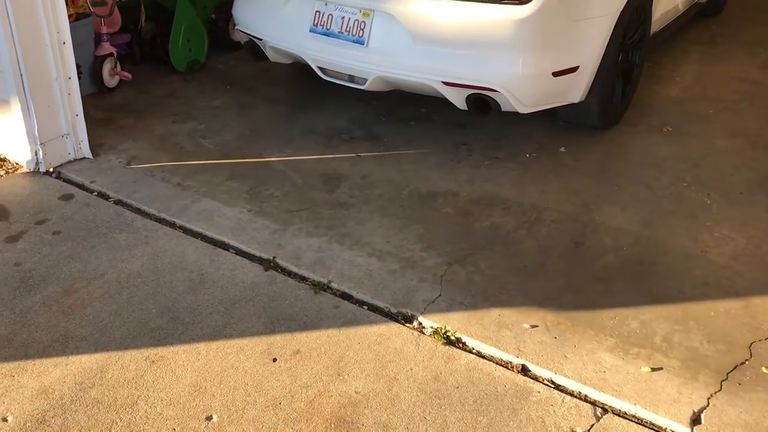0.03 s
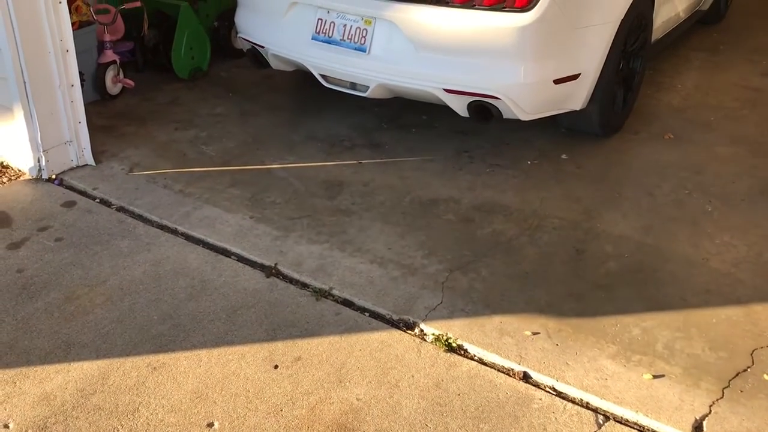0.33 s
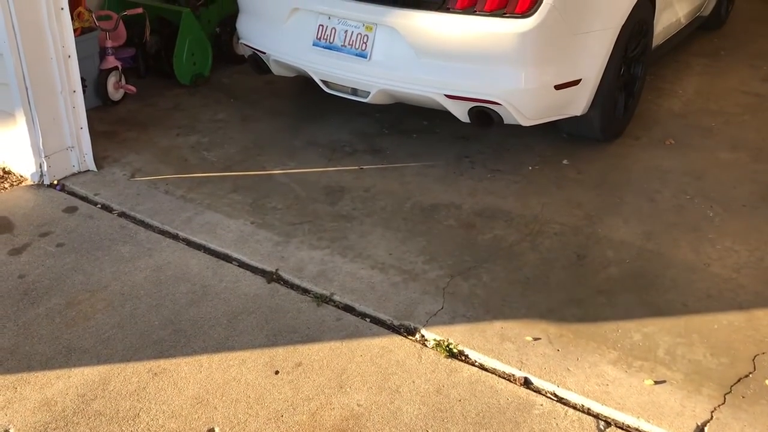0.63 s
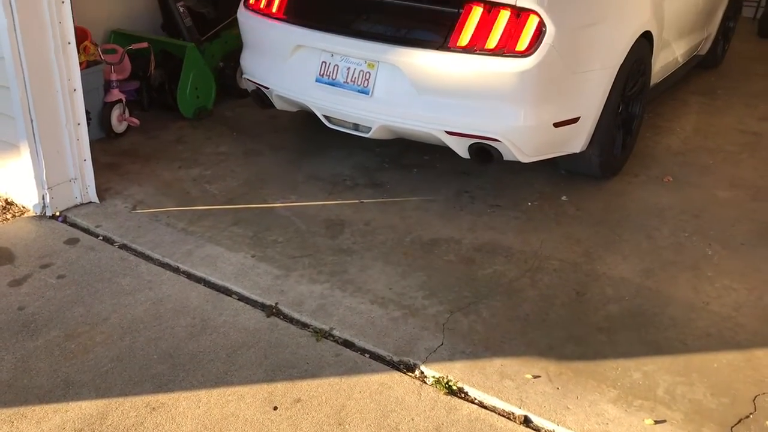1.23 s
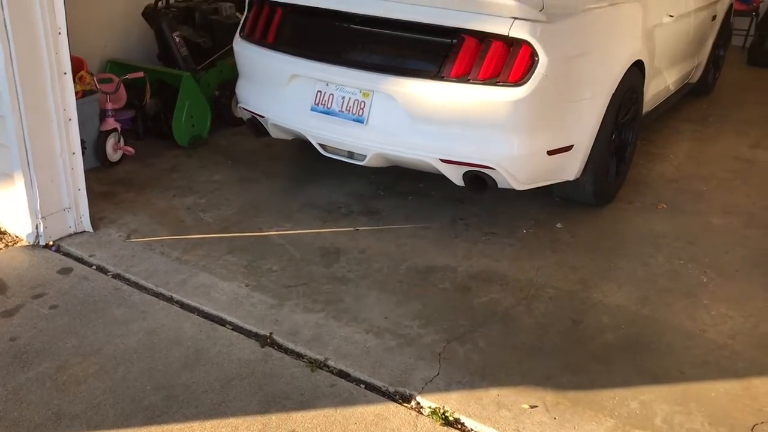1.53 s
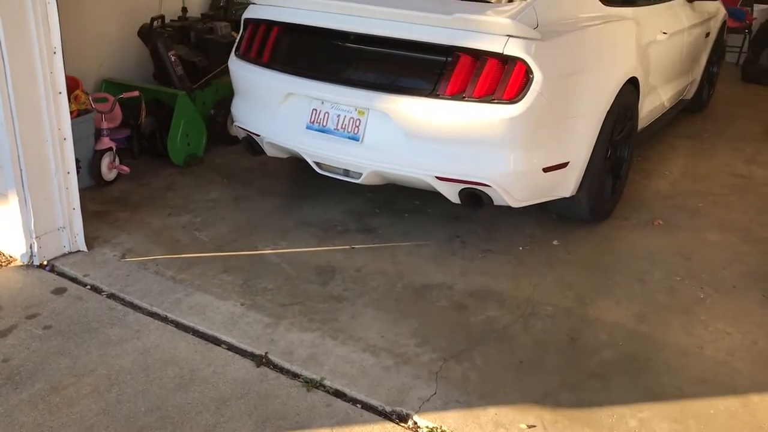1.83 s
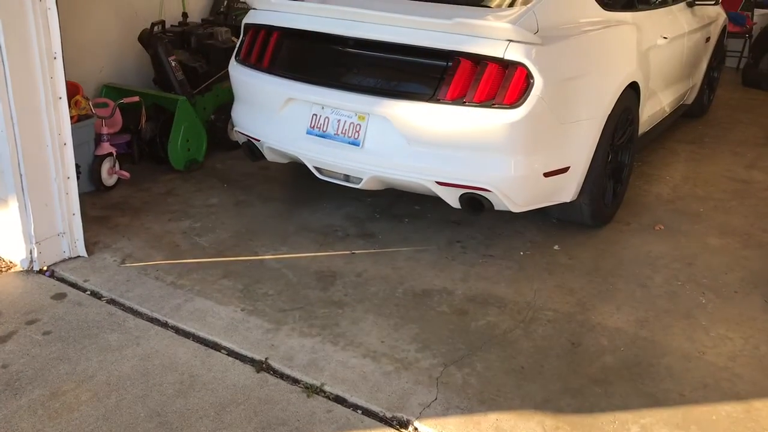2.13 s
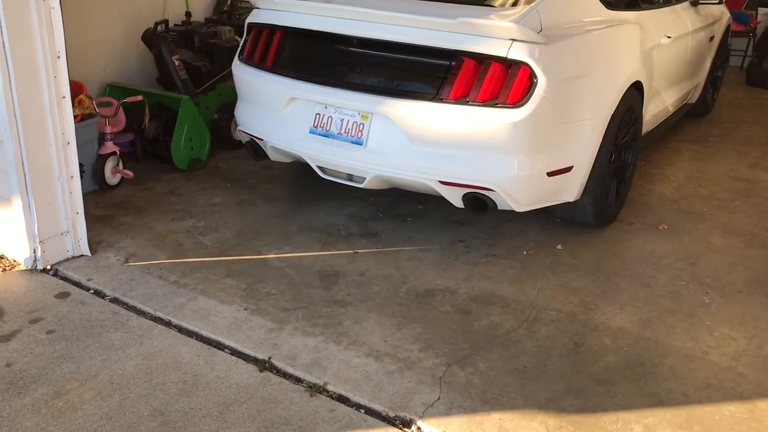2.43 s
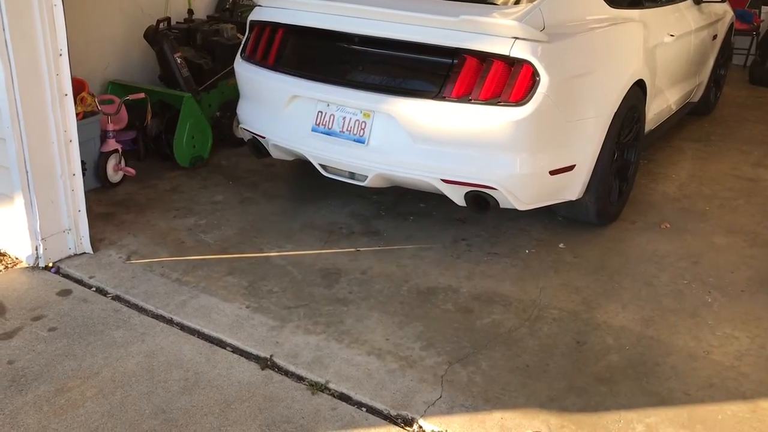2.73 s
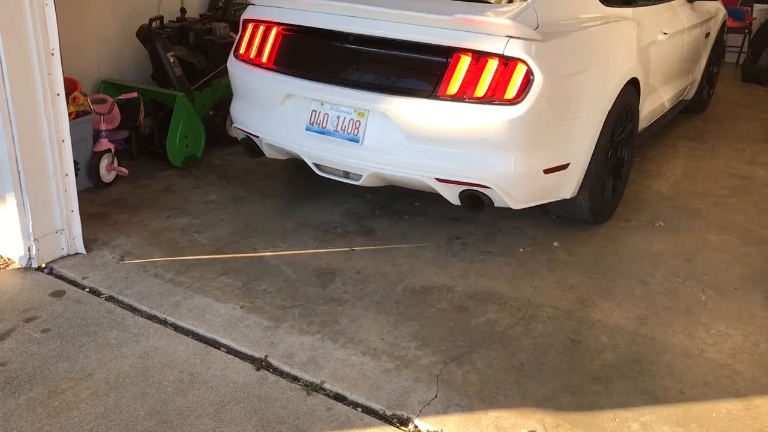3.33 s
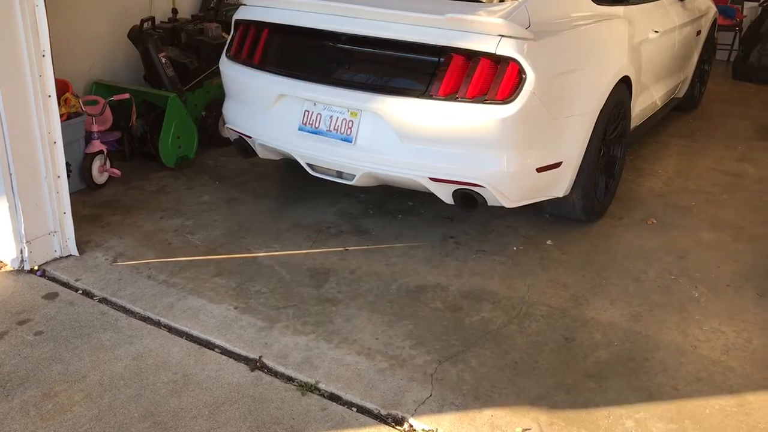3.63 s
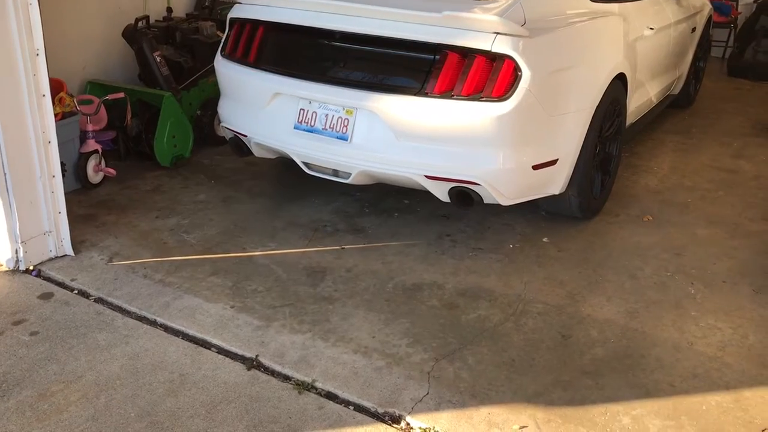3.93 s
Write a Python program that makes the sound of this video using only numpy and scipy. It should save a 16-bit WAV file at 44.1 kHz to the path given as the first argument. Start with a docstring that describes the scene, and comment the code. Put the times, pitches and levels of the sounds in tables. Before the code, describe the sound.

A car's starter motor cranks briefly at the end, ringing and whining off bare garage walls. It follows muffled finger bumps and small plastic clicks close on the microphone, a distant pedal clunk and faint relay ticks.

```python
"""Cold start in an open garage

A hand-held phone on the driveway hears fingers bump and rub it and its case click.
In the car a pedal clunks, relays tick and the fuel pump primes. Then the starter pinion slams
into the ring gear and cranks the engine, slowing at each compression: the tooth impacts ring
the flywheel, the mesh whines, and the bare walls reverberate."""
import sys
import numpy as np
from scipy import signal
from scipy.fft import rfft, irfft
from scipy.io import wavfile
from scipy.ndimage import uniform_filter1d

SR = 44100
rng = np.random.default_rng(int(sys.argv[2]) if len(sys.argv) > 2 else 0)


def int16_out(signal):
    """Quantize to a 16-bit WAV file."""
    q = np.round(np.clip(np.atleast_2d(signal).T, -1, 1) * 32767)
    wavfile.write(sys.argv[1], SR, q.astype(np.int16))


N = 4 * SR


def undb(db):
    """Decibels to amplitude ratio."""
    return 10 ** (np.asarray(db) / 20)

def unit(x):
    """Normalisation to rms 1."""
    return x / np.sqrt(np.mean(x ** 2) + 1e-30)

def clock():
    """Time of each sample in seconds."""
    return np.arange(N) / SR

def noise():
    """Gaussian white noise."""
    return rng.standard_normal(N)

def curve(table, column=1):
    """Linear interpolation of one column over time."""
    rows = np.array(table, float)
    return np.interp(clock(), rows[:, 0], rows[:, column])

def band(x, hz, kind="bandpass", order=2):
    """Butterworth filter."""
    return signal.sosfilt(signal.butter(order, hz, kind, fs=SR, output="sos"), x + 1e-18)

def colour(x, shape):
    """Minimum-phase filter through (frequency_hz, gain_db) points, falling 12 dB per octave below them."""
    hz, db = np.array(shape, float).T
    grid = np.maximum(np.fft.rfftfreq(N, 1 / SR), 1)
    gain_db = np.interp(np.log(grid), np.log(hz), db) + 40 * np.log10(np.minimum(grid / hz[0], 1))
    cepstrum = irfft(np.log(undb(gain_db)), N)
    cepstrum[1:N // 2] *= 2
    cepstrum[N // 2 + 1:] = 0
    response = irfft(np.exp(rfft(cepstrum)), N)[:N // 20]
    return signal.fftconvolve(x, response)[:N]

def fall(start, decay_s):
    """Exponential decay from a sudden onset."""
    age = clock() - start
    return (age >= 0) * np.exp(-np.abs(age) / decay_s)

def gate(start, rise_s):
    """Linear onset ramp."""
    return np.clip((clock() - start) / rise_s, 0, 1)

def bell(centre, width_s):
    """Gaussian envelope."""
    return np.exp(-.5 * ((clock() - centre) / width_s) ** 2)

def add(out, start, x):
    """Superposition of a short sound at a given time."""
    i = int(start * SR)
    out[i:i + len(x)] += x[:N - i]

def ring(modes, t, tilt_db):
    """Impulse response as a sum of damped modes, tilted by tilt_db per octave."""
    return sum(undb(db + tilt_db * np.log2(hz / modes[0][0]) - 60 * t / t60) * np.sin(2 * np.pi * hz * t)
               for hz, db, t60 in modes)


# Outdoor noise spectrum: frequency_hz, gain_db
AIR_SPECTRUM = [(180, -8), (300, -4.5), (450, -9), (950, -9), (1300, -21), (2100, -23.5), (4300, -31),
                (5000, -36.5), (13500, -35.5), (16000, -35)]
def air():
    """Ambient noise: a steady floor, strongest at low frequencies."""
    return undb(-62.5) * unit(colour(noise(), AIR_SPECTRUM))

def faint_hiss():
    """Gated broadband noise: a brief, faint hiss."""
    window = gate(.515, rise_s=.0041) - gate(.922, rise_s=.005)
    return undb(-65) * window * band(noise(), 8600, "lowpass", order=1)

# Hand rumble envelope, before its ceiling: time_s, relative_db
RUMBLE_LEVELS = [(0.0, -32), (0.03, -33), (0.3, -34.5), (0.32, -25.5), (0.85, -35.5), (1.11, -31),
                 (1.2, -42), (1.22, -33.5), (1.64, -35), (1.73, -23), (1.79, -35.5), (2.1, -44),
                 (2.14, -32), (2.45, -39.5), (2.55, -34), (2.83, -38.5), (2.97, -29.5), (3.02, -44.5),
                 (3.12, -29.5), (3.15, -51.5), (3.22, -25), (3.3, -47.5), (3.89, -36), (4.0, -43)]
# Hand rumble spectrum: frequency_hz, gain_db
RUMBLE_SPECTRUM = [(22, -18.5), (35, -3.5), (52, 5), (95, 0.5), (135, -7.5), (190, -14), (300, -21),
                   (420, -33), (700, -45.5), (1200, -78.5)]
# Shifts of the grip: centre_s, level_db, pitch_hz, width_s
GRIP_THUDS = [(1.717, -20, 172, 0.0078), (1.729, -20, 68, 0.017), (1.72, -21.5, 119.2, 0.015),
              (1.112, -22.5, 120, 0.0051), (2.4, -53, 81, 0.022), (3.214, -22, 74, 0.024),
              (3.215, -23.5, 175, 0.0052)]
def grip():
    """Structure-borne sound: the hand rumbles through the phone and thuds softly as it shifts."""
    rumble = unit(colour(noise(), RUMBLE_SPECTRUM))
    rumble /= np.sqrt(uniform_filter1d(rumble ** 2, N // 40))  # evens out the power over 0.1 s
    out = rumble * undb(np.minimum(curve(RUMBLE_LEVELS), -28) + 1)
    for centre, db, hz, width in GRIP_THUDS:
        out += undb(db) * bell(centre, width) * np.sin(2 * np.pi * (hz * clock() + rng.random()))
    return out

# Skin friction between bumps: time_s, level_db
RUBBING_LEVELS = [(0, -46.5), (.3, -52), (.38, -34), (.58, -46), (.78, -48), (1.1, -46), (1.35, -50),
                  (1.46, -69.5), (3.3, -68), (3.4, -85)]
def rubbing():
    """Sliding friction: skin on the phone makes a low, fluttering noise."""
    flutter = undb(6.5 * unit(band(noise(), 60, "lowpass")))
    return undb(curve(RUBBING_LEVELS)) * unit(band(noise() * flutter, (111, 487), order=3))

# Resonances of the phone under a finger: pitch_hz, gain_db
PHONE_MODES = [(165, 0), (330, -7), (700, -2)]
# Finger contacts, harder with a higher cutoff: time_s, peak_db, cutoff_hz
FINGER_BUMPS = [(.041, -22.5, 430), (0.056, -21.5, 314), (.070, -25, 740), (0.1, -29, 382),
                (0.127, -25.5, 313), (0.164, -19, 413), (.175, -24, 485), (.180, -17.5, 176),
                (.258, -24.5, 374), (0.328, -15.5, 510), (0.348, -22, 153), (0.368, -25, 460),
                (.379, -20.5, 424), (.389, -21.5, 690), (0.401, -23, 347), (.428, -15.5, 686),
                (.442, -27, 370), (0.451, -21, 293), (.479, -24, 480), (.501, -20.5, 480),
                (.511, -12.5, 416), (0.522, -9, 250), (.530, -19.5, 630), (0.552, -11, 900),
                (.563, -17.5, 500), (0.572, -24, 450), (0.6, -35, 453), (0.614, -31, 480),
                (0.652, -27.5, 550), (.675, -21, 690), (.686, -20, 316), (.721, -28, 453), (.729, -22, 420),
                (.777, -21.5, 306), (.816, -21.5, 362), (0.838, -22.5, 556), (.885, -22, 476),
                (.893, -18.5, 235), (.926, -22, 280), (.958, -19, 440), (.965, -18, 340),
                (1.039, -22.5, 298), (1.059, -24.5, 453), (1.067, -14.5, 317), (1.092, -23, 410),
                (1.103, -22.5, 430), (1.110, -19, 231), (1.145, -30, 350), (1.178, -20, 290),
                (1.234, -18, 220), (1.253, -24, 347), (1.269, -25.5, 315), (1.326, -25.5, 390),
                (1.335, -23.5, 232), (1.372, -26, 490), (1.415, -24.5, 420), (1.732, -28, 427),
                (1.816, -25, 225), (2.93, -25, 200), (2.946, -29, 172)]
def finger_bumps():
    """Soft impact: a push within a stick-slip rub rings the phone, low-passed by the fingertip."""
    lead_s, rise_s, decay_s, detune = .02, .0037, .0051, .17
    out, t = np.zeros(N), np.arange(N // 40) / SR - lead_s
    swell = np.exp(np.minimum(t / rise_s, -t / decay_s))
    for at, db, cutoff_hz in FINGER_BUMPS:
        grain = rng.standard_normal(len(t))
        force = grain * swell
        force *= undb(-4.5) / np.linalg.norm(force)  # the rub, relative to the push
        force[np.argmax(swell)] += np.sign(grain[-1])  # the push
        shifts = np.exp(detune * grain[:len(PHONE_MODES)])  # modes move with the point of contact
        body = sum(undb(gain_db) * signal.lfilter(*signal.iirpeak(hz * shift, Q=6, fs=SR), force)
                   for (hz, gain_db), shift in zip(PHONE_MODES, shifts))
        dulled = band(force + body, cutoff_hz, "lowpass", order=4)
        bump = band(dulled, 70.6, "highpass")
        add(out, max(at - lead_s, 0), undb(db) * bump / np.abs(bump).max())
    return out

# Light slips of skin: centre_s, level_db, width_s
SKIN_SCUFFS = [(.380, -65, .003), (0.426, -64.5, 0.011), (2.347, -65, 0.0091), (2.404, -64, 0.018),
               (2.787, -57, 0.012), (2.866, -67, 0.0054), (2.906, -66, 0.0067), (3.112, -61, 0.0028),
               (3.141, -67, 0.0084), (3.251, -65.5, 0.0045)]
def scuffs():
    """Stick-slip friction: skin moves over the case in tiny separate ticks."""
    ticks_per_s, scatter_db = 1100, 5.5
    swell = sum(undb(db) * bell(centre, width) for centre, db, width in SKIN_SCUFFS)
    ticks = (rng.random(N) < ticks_per_s / SR) * np.sign(noise()) * undb(scatter_db * noise())
    return swell * unit(band(band(ticks, (5670, 8300), order=1), (4000, 9000)))

# Modes of the case's back and rim: pitch_hz, gain_db, t60_s
BACK_MODES = [(1330, -2.5, 0.017), (1640, -0.5, 0.0079), (2350, -8.5, 0.0065), (3170, -4.5, 0.0078),
              (4260, 0.5, 0.0077), (5300, -12, 0.0052), (6830, 2.5, 0.0041), (8430, 2.5, .004),
              (9260, -8.5, 0.008), (12530, -13, 0.0038), (13700, -20.5, 0.0035)]
RIM_MODES = [(1110, -5, 0.014), (1640, -6, 0.012), (2370, -7, 0.0091), (3250, -3.5, 0.0082),
             (5480, -5.5, 0.0045), (6300, -6, 0.005), (9370, -1.5, 0.0028), (12600, -1, 0.0034),
             (15300, 0.5, .0028)]
# Clicks of the back and rim: start_s, strength_db, tilt_db_per_octave
BACK_CLICKS = [(1.612, -44, -8), (2.291, -42.5, -9), (2.3544, -24.5, -0.5), (2.46, -40.5, -6),
               (2.496, -17, 2), (2.648, -24.5, -0.2), (2.8522, -17.5, 3), (2.905, -36, 4)]
RIM_SNAPS = [(0.4166, -26, 2), (0.4235, -39, 0), (0.8204, -27, 0.5), (1.0224, -18, 1.5), (1.651, -40, -6),
             (2.782, -34, 4), (3.243, -40, 4), (3.431, -38, 2)]
def case_clicks():
    """Damped modal vibration: plastic clicks, each with a ground reflection and a faint echo."""
    detune, reflection_s, echo_rise_s, echo_decay_s = .01, .0061, .015, .011
    out, echo, t = np.zeros(N), np.zeros(N), np.arange(N // 100) / SR
    for events, modes in ((BACK_CLICKS, BACK_MODES), (RIM_SNAPS, RIM_MODES)):
        for start, db, tilt_db in events:
            struck = [(hz * rng.normal(1, detune), gain_db, t60) for hz, gain_db, t60 in modes]
            click = ring(struck, t, tilt_db)
            click *= undb(db) / np.abs(click).max()
            add(out, start, click)
            add(out, start + reflection_s, undb(-27) * click)
            tail = np.exp(-np.abs(clock() - start - echo_rise_s) / echo_decay_s)
            echo += undb(db - 43) * gate(start, echo_rise_s) * tail
    return band(out, 1200, "highpass") + echo * unit(band(noise(), (2500, 10000), order=1))

# Pedal clunk spectrum: frequency_hz, gain_db
PEDAL_SPECTRUM = [(400, -1), (900, 1), (1700, -0.5), (3200, -9), (4500, -19.5), (6500, -21), (9000, -32),
                  (16000, -37)]
def pedal(start_s=1.215):
    """Diffuse decay: the brake pedal's distant clunk arrives mostly as echo."""
    swell = gate(start_s, rise_s=.0065) * fall(start_s, decay_s=.06)
    return undb(-42.5) * swell * unit(colour(noise(), PEDAL_SPECTRUM))

# Valves and relays switching: start_s, level_db
RELAY_TICKS = [(3.02, -60), (3.062, -58), (3.104, -53.5), (3.132, -60)]
def relays():
    """Impact transients: small, distant ticks blurred into bursts of noise."""
    bursts = sum(undb(db) * fall(start, decay_s=.012) for start, db in RELAY_TICKS)
    return bursts * unit(band(noise(), (1200, 2900), order=1))

# Pump hum: harmonic_number, gain_db
PUMP_HARMONICS = [(2, 3), (3, 0), (4, 4), (11, -8)]
# Pump rush spectrum: frequency_hz, gain_db
PUMP_SPECTRUM = [(200, -0.5), (450, 1), (800, -12), (1350, -4), (2200, -24), (5000, -27), (12000, -51)]
def fuel_pump(start_s=3.04, stop_s=3.14, fundamental_hz=126.1):
    """Harmonics over noise: the pump hums and rushes briefly; a faint electric hiss stays on."""
    running = gate(start_s, rise_s=.0078) * (1 - gate(stop_s, rise_s=.0083))
    hum = unit(sum(undb(db) * np.sin(2 * np.pi * k * fundamental_hz * clock())
                   for k, db in PUMP_HARMONICS))
    rush = unit(colour(noise(), PUMP_SPECTRUM))
    hiss = gate(start_s, rise_s=.0095) * unit(band(noise(), (2460, 6260), order=1))
    return running * (undb(-50.5) * hum + undb(-52) * rush) + undb(-70.5) * hiss

def garage(x, t60_s=.44, delay_s=.0075):
    """Reverberation: dense reflections from bare walls follow the direct sound."""
    tail = band(noise(), 8200, "lowpass", order=1) * fall(delay_s, t60_s / np.log(1000))
    echo = signal.fftconvolve(x, tail / np.linalg.norm(tail))[:N]
    wet = undb(-4.5)
    return (x + wet * echo) / np.hypot(1, wet)

# Modes of the flywheel plate and bell housing: pitch_hz, gain_db, t60_s
FLYWHEEL_MODES = [(789, -11, 0.14), (954, -9, .2), (1066, -17, .15), (1244, -6, .15), (1298, -1, 0.34),
                  (1362, -3.5, 0.3), (1432, -8, 0.2), (1612, -1.5, 0.18), (1658, -9, 0.18),
                  (1734, -6.5, .25), (1976, -3.5, 0.25), (2482, -8, 0.26), (3024, -16.5, .22),
                  (3250, -4.5, 0.25), (3493, -1.5, 0.33), (3600, -10, 0.18), (4100, -12, .22),
                  (5282, -7.5, 0.16)]
# Housing crash spectrum: frequency_hz, gain_db
CRASH_SPECTRUM = [(120, -48), (200, -13), (263, -9), (548, -19), (601, -21), (883, -21), (950, -7),
                  (1140, -16), (1320, 1.5), (1530, -15.5), (1650, -5), (1870, -13), (3370, -11.5),
                  (8420, -24.5), (16000, -39)]
# Blows of the engaging pinion: start_s, relative_db
PINION_BLOWS = [(3.474, -5.5), (3.485, -7.5), (3.491, -3.5), (3.495, -1), (3.513, -3.5), (3.545, -23)]
def pinion():
    """Impact excitation: the pinion rattles into mesh, crashing the housing and ringing the flywheel."""
    t, ringing = clock(), np.zeros(N)
    decay_power = sum((undb(db) * fall(at, decay_s=.029)) ** 2 for at, db in PINION_BLOWS)
    contacts = sum(undb(db) * fall(at, decay_s=.0033) for at, db in PINION_BLOWS)
    envelope = gate(PINION_BLOWS[0][0], rise_s=.014) * (np.sqrt(decay_power) + contacts)
    modes = sum(undb(db - 60 * t / t60) * np.sin(2 * np.pi * (hz * t + rng.random()))
                for hz, db, t60 in FLYWHEEL_MODES)
    add(ringing, PINION_BLOWS[2][0], modes)  # from the third blow on
    crash = undb(-30.5) * envelope * unit(colour(noise(), CRASH_SPECTRUM))
    return garage(crash) + undb(-40.5) * ringing

def brushes():
    """Sliding contact: the motor brushes hiss from the pinion's first blow onward."""
    return undb(-56.5) * gate(PINION_BLOWS[0][0], rise_s=.014) * unit(band(noise(), (2520, 7640)))

def squeal(centre_s=3.6, pitch_hz=1965):
    """Tone burst: the gears squeal once."""
    return undb(-41) * bell(centre_s, width_s=.015) * unit(np.sin(2 * np.pi * pitch_hz * clock()))

# Starter teeth meeting the ring gear, slower at each compression: time_s, rate_hz
MESH_RATES = [(3.48, 262), (3.57, 257), (3.61, 305), (3.66, 303), (3.72, 262), (3.76, 281), (3.795, 355.6),
              (3.83, 304.6), (3.875, 297.8), (3.91, 354.3), (3.94, 395), (4.0, 360)]
def mesh_cycles(jitter=.035):
    """Phase as the integral of frequency: the running count of teeth that have met."""
    rate_hz = curve(MESH_RATES) * (1 + jitter * unit(band(noise(), 150, "lowpass")))
    return np.cumsum(rate_hz) / SR

# Response of the gear housing: frequency_hz, gain_db
GEAR_SPECTRUM = [(300, -22.5), (500, -11.5), (620, -12.5), (800, -4.5), (1050, -1.5), (1300, -1),
                 (1600, -4), (1830, -10), (2000, -4), (2300, -11.5), (2600, -8), (2950, -12.5),
                 (4300, -15.5), (5000, -19), (6700, -22.5), (9500, -29.5), (10500, -55), (16000, -52)]
# Mesh whine: harmonic_number, gain_db
WHINE_HARMONICS = [(1, 3), (2, -16.5), (3, -6), (4, -4)]
# Cranking envelopes: time_s, whine_level_db, clatter_gain_db
CRANK_LEVELS = [(3.475, -82, -62), (3.49, -46, -34), (3.55, -51, -41), (3.575, -43.5, -40.5),
                (3.65, -45.5, -38), (3.735, -41.5, -38.5), (3.76, -58, -40), (3.795, -43, -37.5),
                (3.82, -48, -35.5), (3.84, -38.5, -34.5), (3.865, -43, -43.5), (3.895, -59, -44),
                (3.915, -61, -32), (3.957, -39, -37), (3.98, -54, -39.5), (4.0, -50, -41)]
def cranking(cycles):
    """Forced vibration: uneven tooth impacts ring flywheel and housing; the periodic mesh whines."""
    scatter_db, backlash_cycles, flutter_db = 2.5, .1, 2
    tooth = cycles.astype(int)
    force = undb(scatter_db * noise())[tooth]
    contact_phase = np.clip(.5 + backlash_cycles * noise(), .05, .95)[tooth]
    touching = cycles % 1 > contact_phase
    impacts = np.diff(touching * 1., prepend=0) > 0
    grinding = unit(force * touching * noise())
    drive = unit(force * impacts) + undb(-5) * grinding
    body = unit(colour(drive, GEAR_SPECTRUM))
    flywheel = ring(FLYWHEEL_MODES, clock()[:N // 8], tilt_db=-5.5)
    ringing = unit(signal.fftconvolve(drive, flywheel)[:N])
    clatter = undb(curve(CRANK_LEVELS, column=2)) * (undb(-7) * body + undb(-13.5) * ringing)
    tone = sum(undb(db) * np.sin(2 * np.pi * k * cycles) for k, db in WHINE_HARMONICS)
    flutter = undb(flutter_db * unit(band(noise(), 70, "lowpass")))
    whine = undb(curve(CRANK_LEVELS)) * unit(tone * flutter)
    return clatter, whine

def scene():
    """Superposition in mono: the car in its garage, the outdoor air and the hand on the phone."""
    clatter, whine = cranking(mesh_cycles())
    starter_noise = clatter + brushes()
    car = pedal() + fuel_pump() + relays() + pinion() + garage(starter_noise) + whine + squeal()
    background = air() + faint_hiss()
    handling = finger_bumps() + rubbing() + grip() + case_clicks() + scuffs()
    return (background + handling + car)[None]

def record(dry, low_hz=28, top_hz=16000):
    """Band limiting: the phone cuts the deepest bass and the highest treble."""
    lowpass = signal.ellip(8, .2, 80, top_hz, fs=SR, output="sos")
    return signal.sosfilt(lowpass, band(dry, low_hz, "highpass"))


dry = scene()
out = record(dry)
int16_out(out)
```